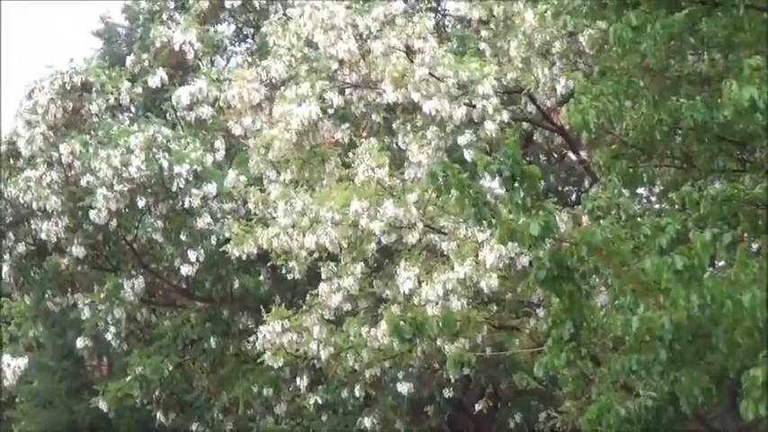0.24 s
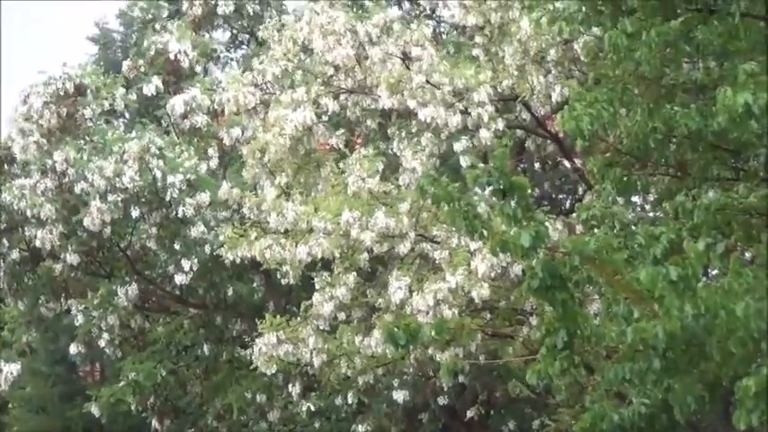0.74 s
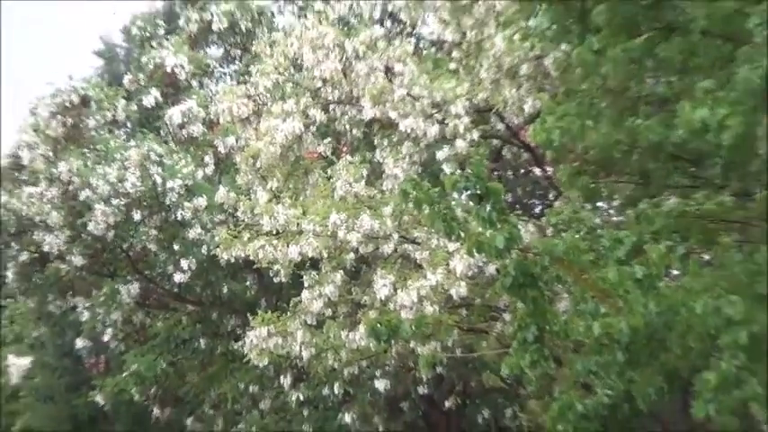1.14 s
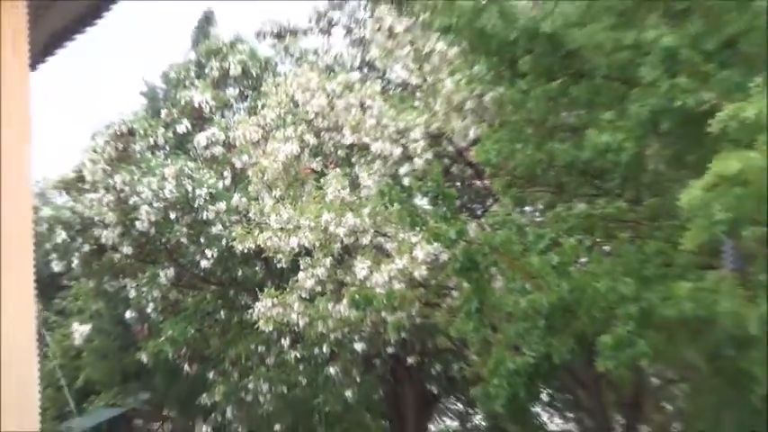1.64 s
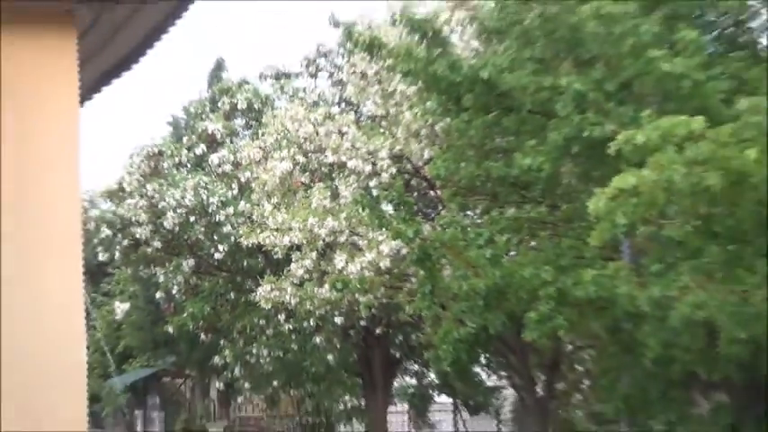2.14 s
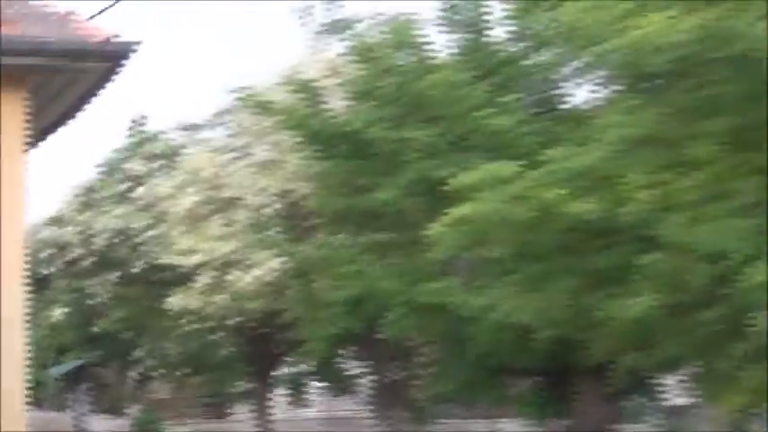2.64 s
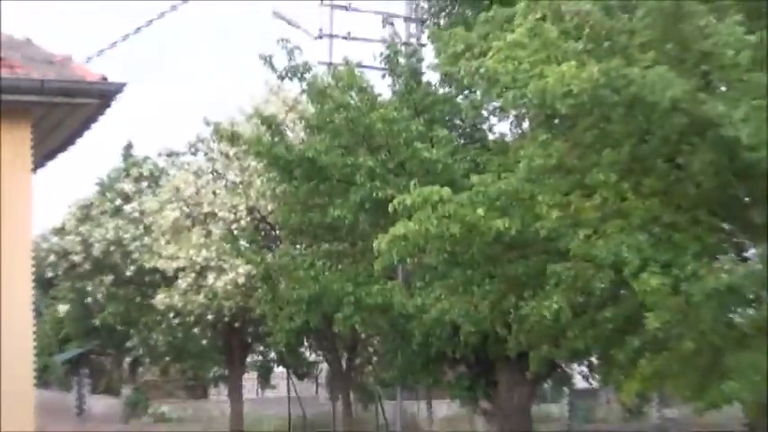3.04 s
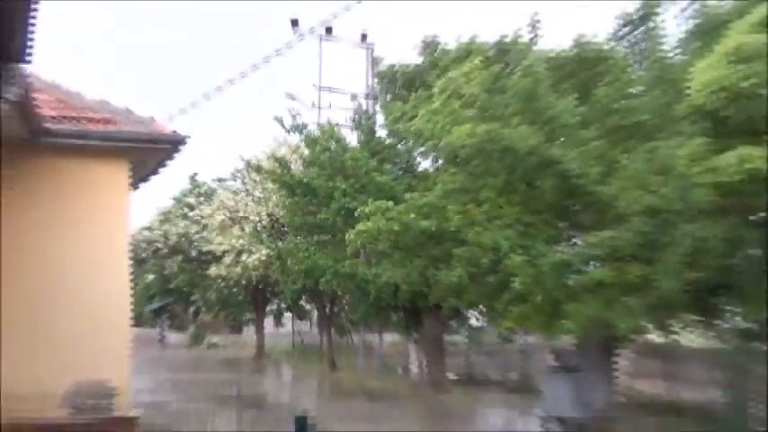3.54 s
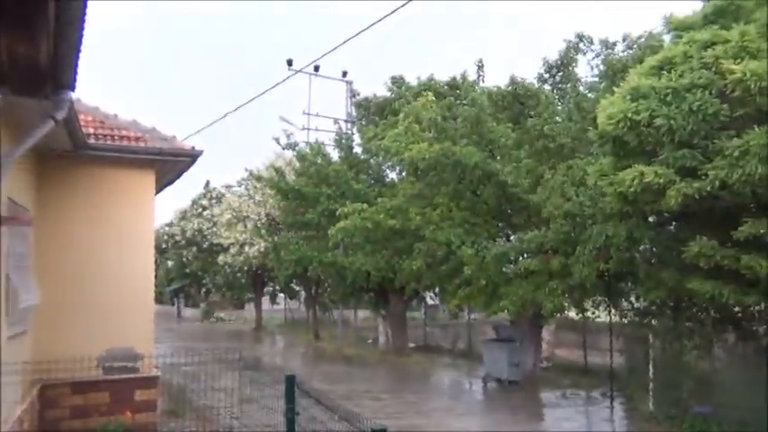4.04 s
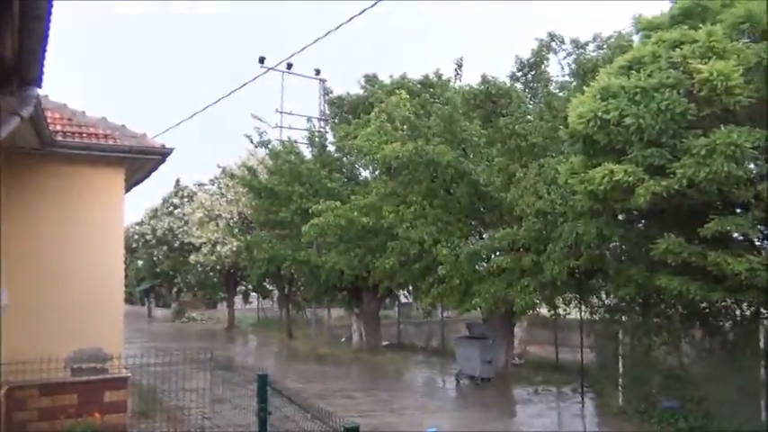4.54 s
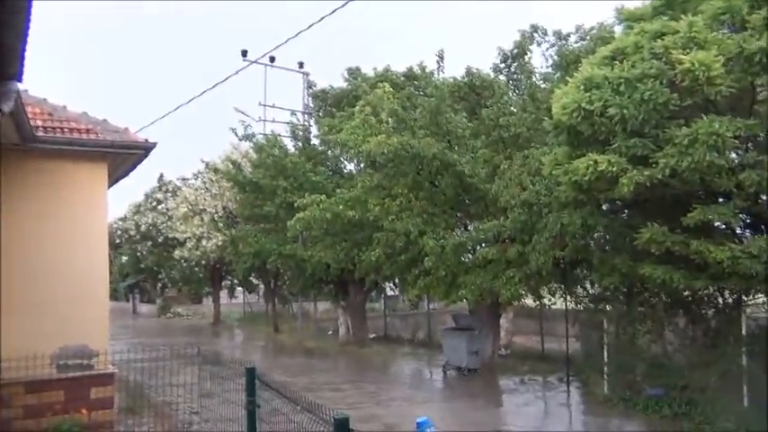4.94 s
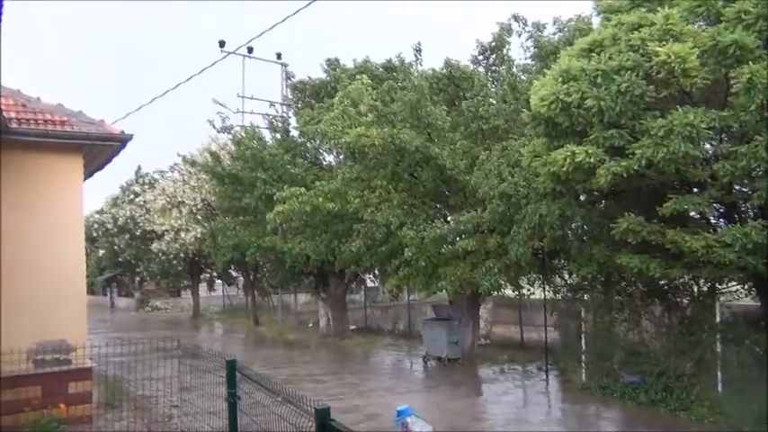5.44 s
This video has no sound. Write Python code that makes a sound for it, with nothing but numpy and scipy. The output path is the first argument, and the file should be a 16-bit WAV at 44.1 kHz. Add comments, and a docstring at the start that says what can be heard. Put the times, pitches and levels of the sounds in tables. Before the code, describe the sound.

Steady rain falls on trees and a puddled yard, a dense even hiss full of sharp close drop ticks and a few wet plops.

```python
"""Steady rain on trees and a puddled yard, heard from beside a house wall.
Far drops merge into a wash of shaped noise whose level drifts and flutters; nearer ones patter as random splashes.
The closest tick sharply on wet surfaces, each a burst of spray with its own colour and ring.
Puddle drops plop as bubbles with a wobbling pitch, some also gliding; heavy drops ring the modes of a hollow thing.
A hard surface close by adds one short reflection, and a stereo microphone pair hears it all."""
import sys
import numpy as np
from scipy import signal
from scipy.fft import rfft, irfft
from scipy.io import wavfile
from scipy.ndimage import uniform_filter1d

SR = 44100
rng = np.random.default_rng(int(sys.argv[2]) if len(sys.argv) > 2 else 0)


def bounce(signal):
    """Save signal as a 16-bit WAV file at the path given by the first command-line argument."""
    frames = np.transpose(np.atleast_2d(signal))
    limited = np.clip(frames, -1, 1)
    pcm = np.round(limited * 32767).astype(np.int16)
    wavfile.write(sys.argv[1], SR, pcm)


N = 250488
LEAD_S = .002  # room ahead of each impact for the spray to rise


def gain_of(db):
    """Turns decibels into an amplitude factor."""
    return 10 ** (np.asarray(db) / 20)


def evened(x):
    """Scales to an rms of 1."""
    return x / np.sqrt(np.mean(x ** 2) + 1e-20)


def read(points, hz):
    """Reads a spectrum in dB at the given frequencies, on a log-frequency axis."""
    f, value = np.transpose(points)
    return np.interp(np.log(hz + 1), np.log(f + 1), value)


def add(mix, s, sound):
    """Mixes a stereo sound in at time s, cut off at the end of the mix."""
    part = mix[:, max(0, round(s * SR)):][:, :sound.shape[1]]
    part += sound[:, :part.shape[1]]


def panned(sound, right_db):
    """Places a sound by level alone, the right channel right_db above the left."""
    return sound * gain_of(np.array([[-.5], [.5]]) * right_db)


def level_drift_db(t):
    """Set course of the heard level at times t: body and hiss, in dB about their column averages."""
    # The heard level of wash and patter over time; only departures from each column's average matter.
    # Each row: time in seconds, level of the body in dB, level of the hiss in dB.
    heard_level = [(0.0, -55, -38.5), (0.52, -52, -39.5), (0.68, -52.5, -36), (0.98, -53, -38),
                   (1.2, -50.5, -35), (1.52, -51, -36), (1.63, -56.5, -39.5), (1.95, -55.5, -40.5),
                   (2.62, -54.5, -38), (2.8, -54.5, -38.5), (3.22, -53.5, -36.5), (3.42, -52.5, -38),
                   (3.6, -53.5, -36.5), (3.85, -53, -37.5), (4.72, -56, -39), (4.8, -58.5, -43),
                   (5.08, -61.5, -44.5), (5.68, -61, -44)]
    s, *bands = np.transpose(heard_level)
    return np.array([np.interp(t, s, band - band.mean()) for band in bands])


def wash():
    """Far rain all around: noise with drifting patches and level, fluttering as the leaves stir."""
    # Relative spectrum of the far rain. Each row: frequency in Hz, level in dB per Hz.
    far_colour = [(20, -34), (45, -22), (65, -39), (110, -12.5), (150, -14), (320, -5), (680, 0.5),
                  (1200, 0.5), (1860, -0.5), (3300, -2), (4300, -2.5), (7000, -5.5), (10200, -12),
                  (12300, -17), (15800, -26.5)]
    # Where the body and the hiss of the level drift lie, in Hz.
    drift_hz = [503, 1650]
    level_db, side_db = -39.0, -10  # overall rms; side signal against the middle
    patchy_db, flutter_db, flutter_s = 2, 1, 0.082  # rms depths; spacing of the flutter's random points

    hz, t, z = signal.stft(rng.standard_normal((2, N)), SR, nperseg=1024, noverlap=768)
    patches = uniform_filter1d(rng.standard_normal(z.shape[1:]), size=7, axis=0)  # across frequency
    patches = evened(uniform_filter1d(patches, size=6, axis=1))  # across time
    flutter = np.interp(t / flutter_s, np.arange(len(t)), rng.standard_normal(len(t)))
    # each frequency follows a blend of body and hiss
    shares = np.array([np.interp(np.log(hz + 1), np.log(drift_hz), row) for row in np.eye(len(drift_hz))])
    db = read(far_colour, hz)[:, None] + shares.T @ level_drift_db(t)
    z = z * gain_of(db + patchy_db * patches + flutter_db * flutter)
    z[1] *= gain_of(side_db)
    mid, side = signal.istft(z, nperseg=1024, noverlap=768)[1][:, :N]
    return gain_of(level_db) * evened(np.array([mid + side, mid - side]))


def splash(centre_hz, octaves, length_s, ring_hz, ring_db, impact=1.8):
    """A drop flattens and bursts: a crack inside a brief burst of spray, then a faint scatter; unit energy."""
    # Relative spectrum of an average splash. Each row: frequency in Hz, level in dB per Hz.
    splash_colour = [(30, -48), (150, -21), (450, -17), (1100, -12), (1450, -2), (1850, 1), (2300, -2.5),
                     (2800, -0.5), (3350, 1), (4100, -5), (5300, -2), (6400, 0), (7400, -1), (8500, -3.5),
                     (10200, -0.5), (11100, -6.5), (12000, -10), (15500, -20.5)]
    size = 2048
    rise_share = 0.22  # spray rises faster than it dies
    scatter_db, scatter_s = -26, 0.0056  # droplets thrown off: level against the spray, decay time
    ring_half_width_hz = 450

    hz = np.fft.rfftfreq(size, 1 / SR)
    t = np.arange(size) / SR - LEAD_S
    spray = np.exp(-np.maximum(t, -t / rise_share) / length_s)
    scatter = gain_of(scatter_db) * np.exp(-t / scatter_s) * (t > 0)
    blow = rng.standard_normal(size) * (spray + scatter)
    blow[round(LEAD_S * SR)] = impact
    blow = rfft(blow)
    # the blow itself is mottled but has no tilt
    blow = blow / np.sqrt(uniform_filter1d(abs(blow) ** 2, size=55))

    # big drops sound low, small ones high, each with a brief ring at its own pitch
    log_gain = np.log(gain_of(read(splash_colour, hz)))
    log_gain -= .5 * (np.log2((hz + 1) / centre_hz) / octaves) ** 2
    log_gain += np.log(gain_of(ring_db / (1 + ((hz - ring_hz) / ring_half_width_hz) ** 2)))
    log_gain = np.maximum(log_gain, log_gain.max() - 10)  # floor in nepers below the peak
    # minimum phase: the colour rings only after the blow
    mirrored = np.r_[log_gain, log_gain[-2:0:-1]]
    colour = np.exp(np.conj(signal.hilbert(mirrored)))[:len(hz)]
    sound = irfft(blow * colour)
    return sound / np.linalg.norm(sound)


def patter_layer(per_s, level_db, range_db, follow, centre_hz, length_s, pan_db, uneven, octaves):
    """One distance of patter: randomly timed splashes of many sizes that follow the level drift."""
    pitch_scatter, count = 0.65, 128  # scatter in octaves per unit draw; different splashes to choose from
    greatest_ring_db = 10
    layer = np.zeros((2, N))
    kinds = []
    for hz in centre_hz * 2 ** (pitch_scatter * rng.triangular(-2, 0, 1, count)):
        length = length_s * (.5 + rng.random())
        ring_hz = hz * 2 ** rng.uniform(-0.38, 0.4)
        drop = splash(hz, octaves, length, ring_hz, greatest_ring_db * rng.random())
        kinds.append(panned(drop, pan_db * rng.standard_normal()))

    late, nearness, kind = rng.random((N // 20, 3)).T
    times = (np.arange(len(late)) + uneven * (late - 1)) / per_s
    db = follow * level_drift_db(times)[-1] + range_db * nearness ** 2  # few land near, many far
    for k in np.flatnonzero((times >= 0) & (times < N / SR)):
        add(layer, times[k], gain_of(db[k]) * kinds[int(kind[k] * len(kinds))])
    return gain_of(level_db) * evened(layer)


def patter():
    """Random drops around the yard at three distances; the nearer ones drip more evenly."""
    # The layers of drops, from far to near. Each row: drops per second, rms level of the layer in dB,
    # range of drop levels in dB, share of the hiss level drift followed, middle of the splash in Hz,
    # mean splash decay in seconds, spread left to right in dB (its sign does not matter),
    # scatter in time in mean gaps, spread of one splash in octaves.
    depths = [(650.4, -45.5, 8.5, 1, 2900, 0.00053, 1.5, 12, 0.73),
              (200.7, -45, 8.5, 0.58, 7450, 0.00085, -3.5, 3, 0.9),
              (50.03, -45.5, 3.5, 0.65, 5180, 0.00091, -1.5, 1.3, 0.96)]
    return sum(patter_layer(*depth) for depth in depths)


def close_drops():
    """The nearest drops on wet surfaces, each a sharp tick with its own colour, length and ring."""
    # Each row: impact in seconds, level in dB over 1 ms before the common trim, centre of the splash in Hz,
    # its spread in octaves, spray decay in seconds, ring pitch in Hz, ring height in dB.
    near_drops = [(0.037, -28.5, 3400, 1.1, 0.0002, 5800, 14), (0.0668, -32, 5000, 2, 0.0012, 7300, 10),
                  (0.0899, -31, 6500, 1.4, 0.0003, 5200, 12), (0.175, -25.5, 2000, 3, 0.0009, 7300, 12),
                  (0.299, -27.0, 3400, 1.2, 0.0008, 5500, 3), (0.3276, -23.5, 3400, 1.4, 0.0014, 5500, 6),
                  (0.3475, -26.5, 2000, 1, 0.0003, 5800, 6), (0.3844, -23.5, 1600, 2, 0.0011, 5800, 8),
                  (0.402, -25.5, 4400, 1, 0.0011, 5500, 6), (0.444, -22.5, 6500, 0.45, 0.00028, 3250, 9),
                  (0.5186, -21.5, 11000, 2.1, 0.0011, 1600, 15), (0.575, -22, 1200, 3.3, 0.00056, 1900, 9),
                  (0.584, -23.0, 1200, 3.5, 0.0002, 6400, 0), (0.6206, -20, 11000, 2, 0.00091, 5500, 6),
                  (0.66, -29, 2600, 3, 0.00064, 5800, 9), (0.6855, -23.0, 4400, 0.87, 0.0014, 8500, 4),
                  (0.717, -22.0, 1200, 3, 0.0007, 6700, 4), (0.7224, -26, 5700, 0.7, 0.0005, 9700, 9),
                  (0.7437, -20, 3400, 2, 0.00078, 2050, 9), (0.7505, -24, 1600, 2.7, 0.0012, 1750, 12),
                  (0.83, -28, 2000, 1.2, 0.0008, 6100, 6), (0.864, -22, 2600, 1.3, 0.00083, 7300, 6),
                  (0.891, -25, 3900, 1, 0.001, 10300, 9), (0.902, -23, 2000, 1.05, 0.0007, 6100, 12),
                  (1.005, -29, 5000, 1.4, 0.0003, 3400, 13), (1.0169, -27, 1200, 3, 0.0007, 2200, 12),
                  (1.0379, -21, 5700, 0.87, 0.001, 5500, 7), (1.056, -25, 1200, 2, 0.0003, 6700, 11),
                  (1.084, -22, 2000, 0.93, 0.0002, 6100, 6), (1.1147, -26, 1200, 3, 0.0005, 4300, 7),
                  (1.129, -25.0, 1200, 2, 0.00081, 7000, 8), (1.154, -20.5, 11000, 1.4, 0.0007, 8500, 8),
                  (1.1645, -23.5, 3900, 0.79, 0.00054, 3550, 5), (1.1737, -23.0, 11000, 2, 0.0002, 8200, 6),
                  (1.1904, -20.5, 1200, 2.3, 0.0013, 7000, 9), (1.2563, -22, 4400, 1.2, 0.0002, 5500, 11),
                  (1.283, -26, 5000, 0.79, 0.0007, 3550, 1), (1.2946, -22, 2600, 1, 0.0003, 5800, 6),
                  (1.31, -22.5, 7400, 1.6, 0.0004, 2500, 15), (1.3559, -27.0, 8500, 0.46, 0.0014, 6100, 6),
                  (1.3741, -20.5, 3900, 1.4, 0.0009, 8200, 10), (1.4381, -26.5, 5000, 3, 0.0007, 6700, 9),
                  (1.462, -27, 1200, 3, 0.0011, 9400, 11), (1.488, -27, 3400, 1.6, 0.0002, 6700, 9),
                  (1.494, -26, 11000, 1.4, 0.00065, 5200, 12), (1.505, -23.5, 8500, 1.4, 0.00055, 6100, 13),
                  (1.5278, -26.5, 11000, 1, 0.0006, 6100, 6), (1.5514, -18, 1200, 3.4, 0.0006, 2050, 7),
                  (1.5705, -24.5, 5700, 0.91, 0.0002, 8800, 9), (1.5795, -26.0, 2600, 2, 0.0011, 4000, 16),
                  (1.6082, -28, 4400, 0.65, 0.0002, 10000, 12), (1.637, -28.5, 1200, 2, 0.0005, 7000, 12),
                  (1.6751, -31, 9700, 2, 0.0003, 6400, 12), (1.685, -30, 1600, 2, 0.0008, 4300, 9),
                  (1.7, -27.5, 5700, 0.64, 0.0013, 5800, 6), (1.7283, -27.0, 3400, 1.2, 0.0007, 5200, 9),
                  (1.752, -24, 5000, 0.58, 0.0003, 7300, 6), (1.7667, -31, 3900, 0.62, 0.0003, 7300, 12),
                  (1.817, -28, 6500, 2, 0.001, 1900, 12), (1.829, -29, 5700, 1.4, 0.001, 2350, 12),
                  (1.852, -28.0, 1200, 3, 0.001, 4000, 15), (1.86, -27, 5000, 3, 0.0012, 3850, 4),
                  (1.9262, -29.0, 4400, 3, 0.00054, 3400, 9), (1.9408, -29, 3400, 3, 0.0012, 5500, 8),
                  (1.955, -25.5, 5700, 0.92, 0.0005, 3850, 13), (1.996, -29.5, 2600, 2.8, 0.0005, 7300, 6),
                  (2.0219, -24, 2600, 2.2, 0.0016, 5500, 5), (2.0376, -25.0, 3380, 0.74, 0.0002, 7000, 4),
                  (2.056, -27, 5700, 1.2, 0.0014, 5500, 4), (2.0922, -23.5, 5700, 1.4, 0.0014, 4000, 4),
                  (2.114, -25.0, 8500, 2.2, 0.0012, 6700, 9), (2.1225, -26.0, 8500, 1.4, 0.0012, 2800, 9),
                  (2.1426, -21.5, 4400, 3, 0.0014, 1920, 6), (2.1626, -23.5, 1200, 2, 0.0004, 10300, 9),
                  (2.173, -27, 5700, 0.7, 0.0002, 8800, 13), (2.1833, -22.5, 11000, 2.2, 0.00051, 6770, 12),
                  (2.222, -25.5, 7400, 0.63, 0.0006, 8500, 6), (2.252, -28, 11000, 1.4, 0.0008, 7900, 3),
                  (2.267, -23.5, 9700, 2.5, 0.0002, 7300, 12), (2.286, -28, 2600, 3, 0.0007, 9400, 6),
                  (2.3021, -23, 5000, 2, 0.0009, 4000, 8), (2.3352, -27, 9700, 2, 0.0014, 8200, 6),
                  (2.3495, -28, 3900, 1.1, 0.0012, 3250, 5), (2.36, -26, 4400, 1, 0.0002, 7600, 12),
                  (2.3914, -21.5, 2000, 3.3, 0.00083, 7300, 6), (2.418, -30, 4400, 1, 0.0006, 7300, 9),
                  (2.4795, -27, 5700, 1, 0.0004, 7300, 3), (2.491, -32, 5700, 0.85, 0.0006, 5200, 8),
                  (2.514, -24.5, 5700, 1.4, 0.0014, 9700, 3), (2.527, -23, 11000, 1.7, 0.0017, 2800, 6),
                  (2.577, -22.5, 3900, 1.4, 0.0007, 7300, 3), (2.592, -25, 7400, 3, 0.0014, 7300, 9),
                  (2.63, -23, 3400, 1.5, 0.0011, 5200, 7), (2.6374, -25.5, 3400, 1.6, 0.0005, 3100, 3),
                  (2.671, -25, 3400, 0.62, 0.0012, 5800, 6), (2.6971, -26.5, 6500, 1, 0.0013, 3250, 12),
                  (2.7088, -27, 2600, 3, 0.0008, 4900, 8), (2.724, -21.5, 4400, 0.7, 0.00023, 4900, 8),
                  (2.7823, -25, 7400, 0.5, 0.0002, 7900, 3), (2.8025, -29, 1200, 2, 0.0009, 3250, 14),
                  (2.823, -28, 5000, 1.4, 0.0014, 7300, 6), (2.8544, -22, 5000, 0.5, 0.0004, 4300, 9),
                  (2.876, -22, 4400, 1.4, 0.00046, 6400, 9), (2.8981, -22.5, 8500, 3.3, 0.0009, 4300, 9),
                  (2.916, -24.5, 1600, 2.4, 0.0014, 8500, 5), (2.9377, -21, 3400, 0.83, 0.0009, 3250, 2),
                  (2.9628, -23.0, 5700, 3.4, 0.00047, 3250, 11),
                  (2.9887, -18.5, 5000, 0.83, 0.0016, 2790, 11), (3.01, -23, 2000, 1.6, 0.00032, 4900, 11),
                  (3.022, -22.5, 2000, 2, 0.0014, 3100, 10), (3.0375, -25, 3400, 3, 0.0014, 7300, 6),
                  (3.055, -25, 4400, 0.5, 0.0006, 4900, 9), (3.059, -28.5, 6500, 1, 0.0004, 3550, 9),
                  (3.0705, -24.5, 6500, 3, 0.0014, 3250, 12), (3.087, -24.5, 11000, 2, 0.0006, 3550, 14),
                  (3.11, -27, 5000, 0.86, 0.001, 8500, 9), (3.174, -25, 6500, 0.45, 0.0008, 9700, 10),
                  (3.19, -17.0, 2000, 1.9, 0.0009, 7300, 3), (3.207, -19, 1200, 3.4, 0.0004, 4660, 12),
                  (3.2143, -19, 2000, 1.7, 0.0011, 6400, 7), (3.2228, -26, 3400, 0.84, 0.0003, 6400, 9),
                  (3.275, -24.5, 2600, 3.3, 0.00068, 3400, 2), (3.29, -26, 5700, 0.44, 0.0014, 6700, 6),
                  (3.3062, -20.5, 3400, 3, 0.00092, 7900, 8), (3.332, -24.5, 6500, 0.9, 0.0007, 6100, 9),
                  (3.3558, -27, 4400, 2, 0.0012, 7300, 11), (3.3624, -21, 3400, 1.2, 0.0012, 5200, 8),
                  (3.3969, -24.5, 4400, 0.77, 0.0005, 7050, 1), (3.442, -24.5, 11000, 3.4, 0.0015, 3100, 9),
                  (3.4668, -24.0, 1200, 3, 0.00035, 4600, 12), (3.4967, -24, 1200, 3, 0.0016, 4300, 11),
                  (3.5173, -26, 4400, 0.57, 0.0007, 3250, 11), (3.5262, -27.5, 6500, 0.7, 0.0002, 6400, 12),
                  (3.534, -22.5, 4400, 0.84, 0.0002, 4900, 6), (3.543, -20.5, 5700, 0.66, 0.0003, 4600, 6),
                  (3.556, -23.5, 2600, 1.4, 0.0002, 3700, 9), (3.563, -22, 1200, 1.6, 0.00066, 1600, 5),
                  (3.575, -25, 8500, 3, 0.0014, 1310, 18), (3.5935, -22.5, 3400, 1.8, 0.0007, 8200, 5),
                  (3.6174, -27, 2600, 0.4, 0.0005, 2050, 4), (3.627, -22, 5700, 1, 0.00035, 2950, 16),
                  (3.634, -22.5, 5000, 1.4, 0.0008, 6400, 4), (3.6564, -19.5, 1600, 1.5, 0.00096, 4600, 9),
                  (3.6618, -26, 9700, 0.58, 0.0003, 8800, 9), (3.68, -24, 3900, 0.65, 0.0008, 7900, 10),
                  (3.694, -21, 5000, 0.79, 0.0003, 6400, 12), (3.7176, -24.5, 3900, 1, 0.0009, 7300, 6),
                  (3.7344, -29, 3400, 3, 0.0002, 1900, 6), (3.738, -27, 6500, 0.5, 0.0002, 7900, 6),
                  (3.7589, -19, 1600, 1.6, 0.00067, 3550, 4), (3.7735, -19.5, 3900, 1, 0.0003, 2200, 2),
                  (3.8261, -24, 3900, 1, 0.0005, 5200, 12), (3.8527, -26, 3900, 1.1, 0.0007, 7900, 8),
                  (3.8607, -18, 2620, 0.8, 0.00059, 5200, 4), (3.9271, -25.5, 1200, 2.7, 0.0005, 1900, 6),
                  (3.937, -22.0, 4400, 0.59, 0.00028, 3250, 10), (3.967, -26.5, 9700, 2, 0.0014, 2950, 12),
                  (3.9934, -28, 1600, 1.3, 0.0002, 8200, 12), (4.017, -28, 1200, 3, 0.0011, 6100, 19),
                  (4.044, -25.5, 2600, 0.92, 0.0014, 1300, 0), (4.059, -26.0, 4400, 1.1, 0.0012, 4600, 11),
                  (4.0787, -27.5, 11000, 3, 0.0008, 3550, 6), (4.092, -26.5, 4400, 0.79, 0.0006, 3250, 9),
                  (4.0993, -25, 5700, 1.6, 0.0007, 8200, 9), (4.1395, -23.5, 2600, 1.4, 0.0003, 3400, 12),
                  (4.1577, -18, 2600, 1.15, 0.00016, 4300, 10), (4.179, -23.5, 1200, 2, 0.0008, 9100, 6),
                  (4.1906, -22, 1200, 2.7, 0.0005, 7000, 3), (4.239, -25.0, 5700, 0.7, 0.0006, 7300, 4),
                  (4.2496, -27, 4400, 0.88, 0.00059, 5500, 12),
                  (4.256, -25.5, 1200, 1.4, 0.0014, 10300, 12), (4.286, -29, 11000, 2.6, 0.0003, 2050, 9),
                  (4.363, -24.0, 6500, 0.34, 0.00085, 3850, 7),
                  (4.393, -21.5, 5000, 0.57, 0.00037, 2810, 17), (4.4195, -22.5, 3900, 3, 0.0013, 3230, 15),
                  (4.4407, -27, 5700, 0.44, 0.0006, 10300, 12), (4.4806, -23.5, 2000, 3, 0.0009, 1600, 10),
                  (4.5002, -20.5, 2600, 3, 0.00037, 3100, 9), (4.51, -25.5, 5000, 1.2, 0.0002, 8500, 4),
                  (4.535, -24.5, 1200, 2, 0.0003, 10000, 6), (4.5487, -19, 3900, 1.4, 0.00037, 5800, 6),
                  (4.5931, -18, 2600, 1.06, 0.00042, 1750, 6), (4.6224, -24.0, 3400, 3, 0.0002, 5200, 6),
                  (4.6313, -21.0, 3900, 1, 0.0003, 2200, 6), (4.648, -26, 1600, 3.3, 0.0006, 1750, 3),
                  (4.694, -28.5, 2600, 3, 0.0003, 10300, 14), (4.714, -22, 1600, 3.5, 0.00031, 7350, 11),
                  (4.8711, -20.5, 2600, 3, 0.00042, 6360, 9), (4.8869, -30, 3400, 1.2, 0.0003, 2950, 13),
                  (4.901, -25.0, 5000, 0.46, 0.0002, 5800, 6), (4.965, -22, 4400, 1.5, 0.00022, 3250, 8),
                  (4.9724, -31, 7400, 2, 0.0003, 2780, 19), (4.9863, -29, 2600, 0.5, 0.0006, 2650, 6),
                  (5.004, -31.5, 7400, 2, 0.0014, 7900, 9), (5.0525, -32, 5000, 1, 0.001, 4300, 6),
                  (5.065, -30.5, 3400, 0.48, 0.0002, 1300, 7), (5.0995, -34, 11000, 1, 0.0014, 4600, 6),
                  (5.112, -31, 5000, 0.41, 0.0014, 6700, 3), (5.163, -31, 3900, 1.4, 0.0002, 9000, 15),
                  (5.197, -32, 11000, 3.3, 0.0014, 2800, 18), (5.2155, -26.5, 4400, 1, 0.00016, 3850, 3),
                  (5.267, -29, 8500, 1.4, 0.00087, 6700, 6), (5.3406, -31.0, 11000, 2, 0.0007, 9400, 9),
                  (5.352, -33, 3900, 0.5, 0.0007, 2800, 3), (5.3638, -31, 5700, 0.7, 0.0008, 6100, 3),
                  (5.376, -27.5, 1200, 3, 0.00063, 9400, 6), (5.3931, -31.5, 1200, 2, 0.0009, 7600, 6),
                  (5.453, -32.0, 4400, 0.45, 0.0002, 10300, 12), (5.5, -28.5, 5000, 0.8, 0.0006, 2800, 11),
                  (5.5145, -28, 5000, 3, 0.00023, 7600, 13), (5.5334, -33, 2600, 1.4, 0.0013, 4000, 3),
                  (5.5669, -25, 1200, 1.54, 0.0009, 4020, 12), (5.589, -31.5, 9700, 3, 0.0008, 7000, 9),
                  (5.6065, -33, 4400, 1, 0.0003, 1300, 12), (5.61, -33.5, 1200, 2.2, 0.0007, 7300, 6)]
    trim_db, impact = 0.18, 1.76
    ticks = np.zeros((2, N))
    one_ms = SR / 1000  # in samples
    for s, db, hz, octaves, length_s, ring_hz, ring_db in near_drops:
        tick = splash(hz, octaves, length_s, ring_hz, ring_db, impact)
        tick = gain_of(db + trim_db) * np.sqrt(one_ms) * tick
        add(ticks, s - LEAD_S, panned(tick, .5 * rng.standard_normal()))
    return ticks


def plops():
    """Puddle drops: trapped bubbles ring briefly, wobbling in churning water; some also glide in pitch."""
    # Each row: start in seconds, level in dB before onset and trim, bubble pitch in Hz before wobble,
    # time to fall 60 dB in seconds, glide in octaves per second (zero for a steady one).
    bubbles = [(3.26, -28, 340, .03, 20), (3.267, -28.5, 470, .025, 20), (3.273, -26, 620, .028, 12),
               (3.432, -20.5, 1200, .024, 0), (3.576, -21, 1250, .018, 0), (3.581, -19.5, 950, .02, -15),
               (3.585, -28, 520, .02, 0), (3.655, -25.5, 1060, .02, 0), (3.661, -31, 370, .03, 0),
               (5.359, -48, 170, .05, 0), (5.393, -37, 797, .12, .5)]
    rise_s, trim_db = 0.002, -1.5
    wobble_octaves, wobble_s = .16, .0015  # rms of the random points; their spacing
    water, t = np.zeros((2, N)), np.arange(SR // 10) / SR
    for s, db, hz, t60, glide in bubbles:
        churn = np.interp(t / wobble_s, np.arange(len(t)), rng.standard_normal(len(t)))
        turns = np.cumsum(hz * 2 ** (glide * t + wobble_octaves * churn)) / SR
        envelope = np.exp(-np.log(1000) * t / t60) * (1 - np.exp(-t / rise_s))
        ring = envelope * np.sin(2 * np.pi * turns)
        add(water, s, panned(gain_of(db + trim_db) * ring, 0))
    return water


def knocks():
    """Heavy drops splash and set the modes of a small hollow thing ringing."""
    # Heavy drops. Each row: impact in seconds, level in dB before the band limit.
    heavy_drops = [(4.8089, -17.5), (4.8152, -32), (5.5682, -33), (5.5735, -40)]
    # Modes of the hollow thing. Each row: pitch in Hz, level in dB against the knock,
    # time to fall 60 dB in seconds.
    modes = [(850, -12, .01), (1100, -5, .024), (1260, -7, .02), (1850, -3, .011), (2150, -2, .011),
             (2480, -1, .022), (3330, -10, .02), (4030, -10, .014), (4550, -10, .012), (4920, -10, .012)]
    splash_db, rise_s = 10, .0003  # splash energy scale against the knock level; onset of the ring
    hollow, t = np.zeros((2, N)), np.arange(SR // 10) / SR
    ring = sum(gain_of(db) * np.exp(-np.log(1000) * t / t60) * np.sin(2 * np.pi * hz * t)
               for hz, db, t60 in modes)
    for s, db in heavy_drops:
        add(hollow, s, panned(gain_of(db) * (1 - np.exp(-t / rise_s)) * ring, 0))
        burst = splash(2070, 1.1, 0.0009, 2300, 5)
        add(hollow, s - LEAD_S, panned(gain_of(db + splash_db) * burst, 0))
    # too small to radiate bass, and the soft drop excites little treble
    band = signal.butter(4, [700, 5400], "bandpass", fs=SR, output="sos")
    return signal.sosfilt(band, hollow)


def echo(x):
    """One hollow reflection from a hard surface close by; it ripples the colour of the rain."""
    delay_s, level_db, band_hz = .0022, -9.5, [1350, 2450]
    reflection = np.zeros((2, N))
    b, a = signal.butter(1, band_hz, "bandpass", fs=SR)
    add(reflection, delay_s, gain_of(level_db) * signal.lfilter(b, a, x))
    return reflection


def scene():
    """Far wash, three depths of patter, close drops, plops and knocks; the left is slightly louder."""
    # Balance of the rain. Each row: time in seconds, right minus left in dB.
    balance = [(0, -.6), (1.2, -.6), (3.5, -1.3), (5.68, -1.3)]
    distant = wash()
    drops = patter() + close_drops() + plops() + knocks()
    rain = distant + drops + echo(drops + .5 * distant)
    return panned(rain, np.interp(np.arange(N) / SR, *np.transpose(balance)))


def record(dry):
    """A close microphone pair, nearly mono in bass and narrow in top treble; then a 16 kHz band limit."""
    # How well the pair tells left from right. Each row: frequency in Hz, gain on the side signal in dB.
    width = [(40, -11), (130, -23), (280, -21), (550, -9), (1100, -2), (2000, -.5), (4500, 1.3), (8000, 2),
             (12000, -8)]
    mid, side = (dry[0] + dry[1]) / 2, (dry[0] - dry[1]) / 2
    side = irfft(rfft(side) * gain_of(read(width, np.fft.rfftfreq(N, 1 / SR))), N)
    edge = signal.firwin(511, 16000, window=("kaiser", 9), fs=SR)
    return signal.oaconvolve(np.array([mid + side, mid - side]), edge[None], "same", axes=1)


dry = scene()
out = record(dry)
bounce(out)
```